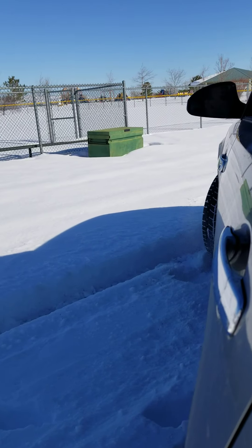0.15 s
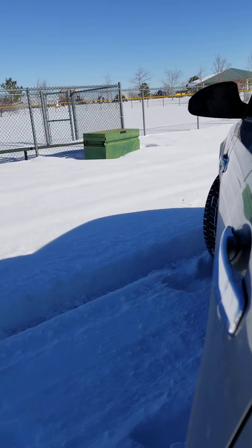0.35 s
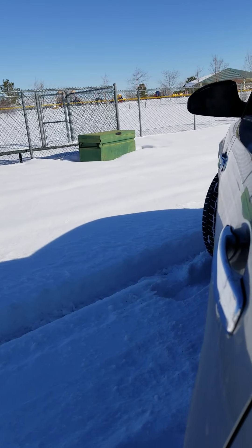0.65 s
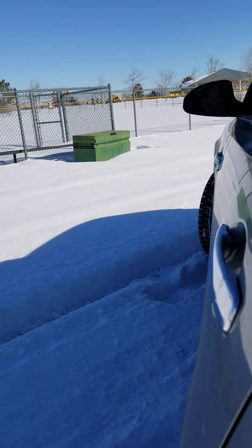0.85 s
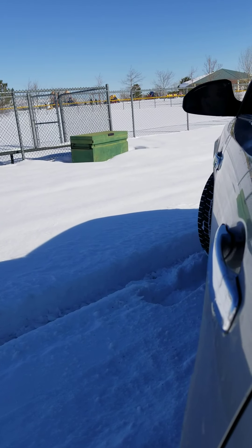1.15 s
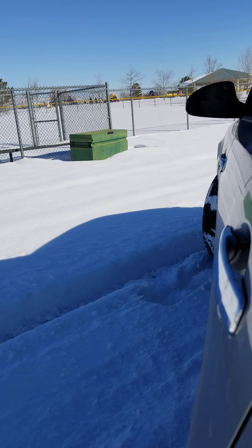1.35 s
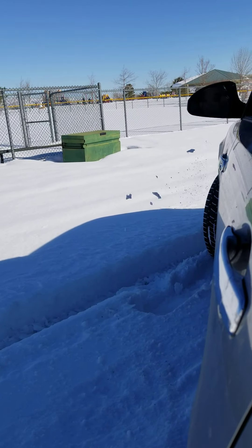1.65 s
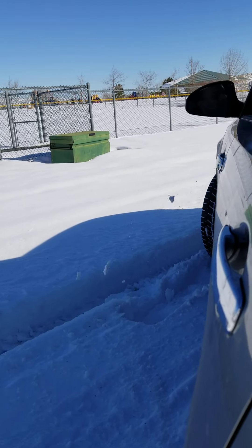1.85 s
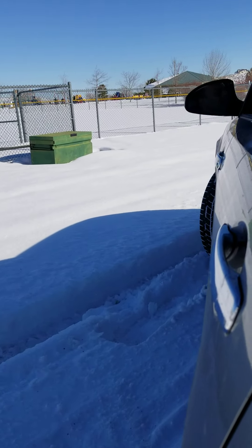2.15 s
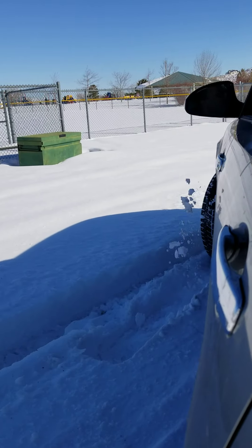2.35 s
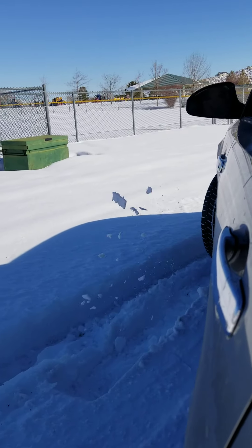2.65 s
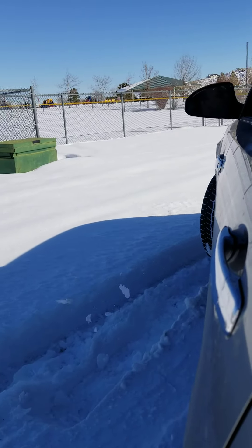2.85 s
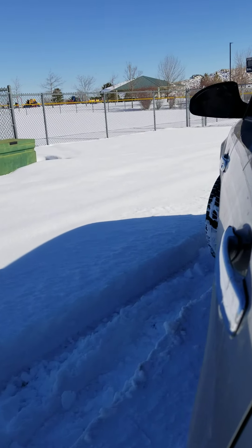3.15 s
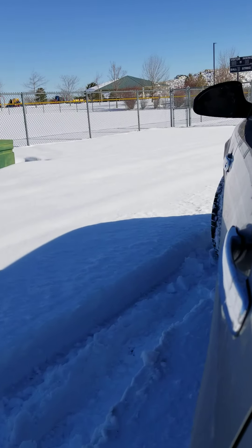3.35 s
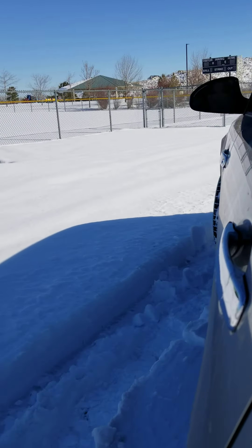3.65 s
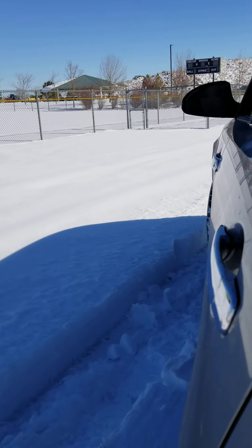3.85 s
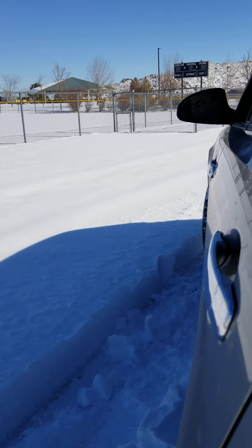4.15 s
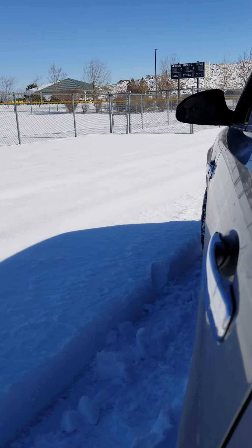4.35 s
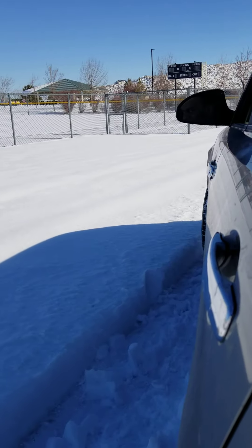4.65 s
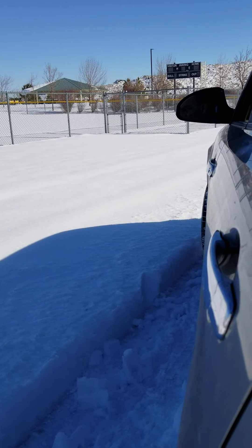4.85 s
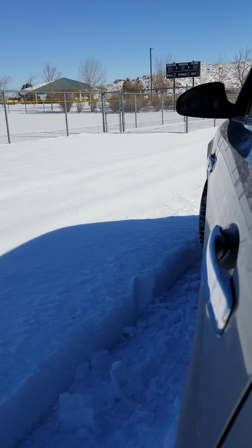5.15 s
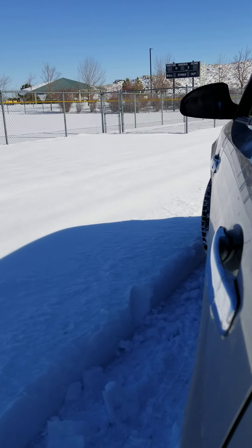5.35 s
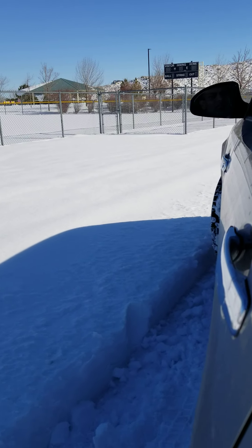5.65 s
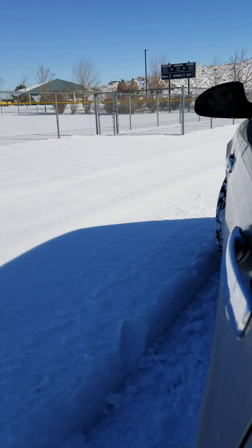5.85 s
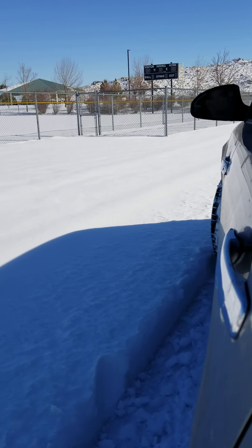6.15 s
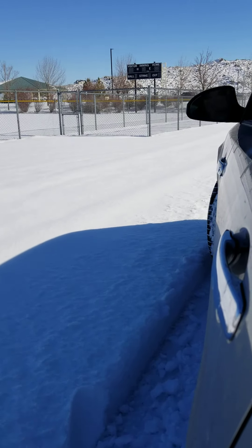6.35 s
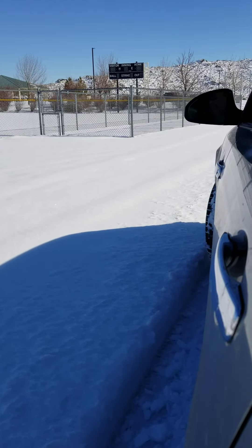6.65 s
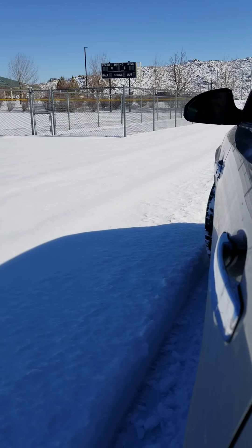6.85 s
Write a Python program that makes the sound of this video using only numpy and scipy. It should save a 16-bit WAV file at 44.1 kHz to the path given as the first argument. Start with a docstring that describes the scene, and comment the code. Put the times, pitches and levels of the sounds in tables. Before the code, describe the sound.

A six-cylinder engine repeatedly revs up and sags in a low boomy growl as a vehicle ploughs through deep snow with soft crunching and faint hissing.

```python
"""Deep snow, heard from the open side window of a V6 SUV that ploughs through it.
The engine revs up and falls back again and again: summed sine waves make its firing pulses, and a pipe
filter makes them boom. A faint howl of the air box joins in when the engine pulls.
Grainy noise makes the tyres' rumble and crunch, the scraping floor and the hissing spray of snow.
Short bursts of noise are lumps, ice crumbs and jolts that hit the body."""
import sys
import numpy as np
from scipy import signal
from scipy.fft import rfft, irfft, next_fast_len
from scipy.io import wavfile

SR = 44100
rng = np.random.default_rng(int(sys.argv[2]) if len(sys.argv) > 2 else 0)


def persist_wave(psi):
    """Save psi, clipped to +-1, as 16-bit WAV."""
    counts = np.round(np.clip(psi, -1, 1) * 32767).astype(np.int16)
    wavfile.write(sys.argv[1], SR, np.atleast_2d(counts).T)


N = 308259
TIME = np.arange(N) / SR

# engine speed before the flywheel smooths it: time_s, firings_per_s
ENGINE_SPEED = [(0.0, 87.3), (0.1, 80.9), (0.22, 66.9), (0.42, 59.7), (0.58, 44.8), (0.69, 57.4),
                (0.86, 51.9), (0.98, 58.8), (1.12, 77.3), (1.24, 87.2), (1.5, 97.4), (1.85, 118.1),
                (2.2, 132.1), (2.35, 124.0), (2.5, 101.7), (2.8, 71.5), (2.93, 68.4), (3.15, 85.4),
                (3.33, 90.6), (3.52, 76.3), (3.8, 54.2), (4.02, 43.0), (4.48, 40.4), (4.68, 52.5),
                (5.03, 81.8), (5.68, 83.9), (6.0, 88.5), (6.3, 64.0), (6.48, 48.9), (6.75, 43.2),
                (6.99, 45.5)]
FLYWHEEL_HZ = 12   # the flywheel rounds off turns of speed that are quicker than this

# presses of the accelerator: start_s, end_s, load (1 = full), bark_share (0 = none, about 1 = full)
PEDAL_PRESSES = [(-.5, -0, 1.05, 0.94), (.82, 2.29, 0.88, 1.07), (2.74, 3.353, 0.98, 0.64),
                 (4.536, 5.962, 0.87, 0.93)]
PRESS_S, LIFT_S = 0.27, 0.23

# shape of the firing pulse, against its base tone: multiple (of the firing rate), level_db
PULSE_OVERTONES = [(2, -4.5), (3, -8.5), (4, -10), (5, -12.5), (6, -14), (7, -17), (8, -18.5), (9, -16.5),
                   (10, -21), (12, -17.5)]
IDLE_DB, LOAD_DB = -26, 8.5   # pulse strength at idle before the pipe, and its gain at full load

# extra gain of the overtones while they bark, greatest where the engine pulls hardest: firings_per_s, gain_db
BARK_GAIN_BY_SPEED = [(56, 1), (66, 2), (76, 10), (93, 10.5), (110, 5), (131, 8)]
BARK_FROM_HZ = 260   # only overtones above about this pitch bark
BARK_IDLE_DB = -9    # their change in level at idle
BARK_LAG_S, BARK_FADE_S = 0.11, 0.32   # they answer the pedal late and fade slowly

# overrun, when the engine coasts with its fuel cut; changes in level:
# start_s, end_s, all_pulses_db (less under load), base_tone_db
COASTING = [(-.3, 0.613, -3, -15), (2.448, 2.723, 1.5, -6.5)]
CUT_S, REFUEL_S = 0.24, 0.19

# the engine nearly stalls once
STALL_AT_S, STALL_WIDTH_S, STALL_DB = 0.603, 0.063, -10

# mismatch of the two cylinder banks, at half the firing rate; it swells to a shudder on the highest rev
BANKS_DB, SHUDDER_DB, SHUDDER_AT_S, SHUDDER_WIDTH_S = -20.5, -3.5, 2.2, 0.05

# tone of the exhaust pipe and silencer: pitch_hz, gain_db
PIPE_TONE = [(22, -53), (33, -10.5), (42, -4), (58, 3.5), (83, -9.5), (103, -14.5), (128, -5), (160, 1.5),
             (186, -2.5), (222, -28.5), (305, -16.5), (364, -11.5), (395, -10), (435, -28.5), (492, -16.5),
             (570, -32.5), (690, -18.5), (900, -26), (1500, -48.5)]

# resonances of the air box, with their level in tune at load 1:
# multiple (of the firing rate that drives it), pitch_hz, width_hz, level_db
AIRBOX_RESONANCES = [(5, 387.5, 44, -35), (9, 688, 93, -42)]

# weight of the snow that the tyres push, as rumble before its gain: time_s, level_db
SNOW_WEIGHT = [(0, -41), (.3, -50.5), (1.0, -53.5), (2.2, -43), (2.9, -49), (3.68, -45.5), (3.85, -42.5),
               (4.7, -45), (6.99, -43)]
# once the car rolls steadily the snow gives way in regular steps
STEPS_FROM_S, STEPS_PER_S, STEP_AT_S, STEP_DB = 3.9, 7.19, 5.78, 1.5

# how hard the tread churns the snow; drives crunch and hiss, before their gains: time_s, level_db
TREAD_CHURN = [(0.0, -56), (0.11, -54), (0.99, -66), (1.36, -56.5), (1.5, -59.5), (2.22, -51.5),
               (3.08, -58), (3.37, -54), (3.77, -62), (3.95, -51), (3.97, -54), (4.81, -62), (4.94, -57.5),
               (6.68, -57.5), (6.97, -64.5), (6.99, -57.5)]
CRUNCH_FOLLOWS = 0.77   # share of the churn's swing that the crunch follows

# clods collapse under the tyre with a loud crunch, before the throb: start_s, length_s, level_db
CRUSHED_CLODS = [(-.02, 0.046, -37), (2.11, .12, -42.5), (3.847, .1, -49.5), (4.046, .07, -45.5),
                 (6.282, 0.1, -43.5)]
CLOD_RISE_S, CLOD_FALL_S = 0.0073, 0.16

# the floor pan drags through a drift: start_s, end_s, level_db
FLOOR_DRAGS = [(1.9, 2.85, -64), (5.466, 5.912, -48), (6.245, 6.696, -48)]
DRAG_RISE_S, DRAG_FALL_S, BRUSH_DB = 0.12, 0.42, -64   # between drifts it only brushes the snow

# fine powder in the air, as spray before its gain: time_s, level_db
AIRBORNE_POWDER = [(0, -74), (.5, -66), (1.0, -77.5), (1.85, -66.5), (2.05, -60.5), (3.5, -63.5),
                   (3.65, -70), (3.9, -60), (5.2, -63.5), (6.7, -66), (6.99, -78)]

# slabs of snow slide off the tyre and burst, before the surges and the spray's gain:
# start_s, length_s, spray_db, hiss_db
SNOW_SLIDES = [(.28, 0.093, -62, -63), (1.946, .14, -73, -55.5), (2.203, 0.21, -70, -51.5),
               (2.676, 0.099, -64, -54), (3.082, 0.086, -64, -58), (3.271, 0.17, -58.5, -53),
               (3.524, 0.037, -60, -54), (3.798, 0.16, -58.5, -57.5), (4.18, 0.14, -58.5, -56),
               (4.414, 0.093, -66, -56.5), (4.928, 0.21, -66, -60), (5.607, 0.11, -60, -53.5),
               (5.77, 0.16, -58.5, -55), (6.03, 0.14, -60, -70), (6.308, .08, -61.5, -61)]
SLIDE_RISE_S, SLIDE_FALL_S = 0.043, 0.044

# tone of each snow noise, before it is set to an even level: pitch_hz, gain_db
RUMBLE_TONE = [(20, -38.5), (30, -20.5), (42, 4.5), (70, 10), (110, 5), (175, 5), (230, 0.5), (330, -6),
               (440, -14.5), (700, -23.5), (1500, -52)]
CRUNCH_TONE = [(150, -25), (330, -1), (480, -1.5), (720, -1), (1000, -7), (1300, -11.5), (1650, -15),
               (2200, -26), (4000, -46.5), (9000, -65)]
SCRAPE_TONE = [(350, -27), (600, -10), (820, 1.5), (1050, -1.5), (1300, -2.5), (1700, -16.5), (3000, -33.5)]
HISS_TONE = [(500, -16), (1200, 1.5), (1750, 8.5), (2300, 2.5), (3100, 1.5), (4000, 1), (5000, -7.5),
             (6000, -5), (7200, -9.5), (9000, -26.5), (14000, -31)]
SPRAY_TONE = [(3000, -33), (4400, -2.5), (5500, 0.5), (6300, -2.5), (8000, -5), (9500, 0.5), (11000, -1),
              (13000, 3), (14500, 0)]
# how alike the two channels are: pitch_hz, likeness (0 to 1)
CHANNEL_LIKENESS = [(60, 1), (200, 1), (400, 0.71), (1000, 0.59), (2500, 0.46), (4000, 0.25), (6500, 0.23),
                    (8500, 0)]

# single blows: start_s, peak_db, decay_s (time to fall by 60 dB)
LUMP_KNOCKS = [(.018, -32, .04), (.136, -29, .025), (.335, -29, .04), (6.285, -31, .1), (6.378, -33, .07),
               (6.418, -34, .04)]   # lumps of snow knocking under the body
ICE_TICKS = [(.358, -40, .008), (.408, -41, .006), (.436, -39, .01), (.477, -40, .008), (.55, -44, .006),
             (.563, -44, .006), (1.413, -38, .02), (2.256, -28, .01), (2.43, -38, .006), (3.587, -37, .014)]      # ice crumbs ticking on the paint
BODY_JOLTS = [(.29, -20, .15), (3.79, -20.5, 0.1), (6.365, -27, 0.054)]     # jolts of the body
# tone of each kind of blow, before its peak is set: pitch_hz, gain_db
KNOCK_TONE = [(100, -10), (400, 0), (750, -1), (1200, -4), (1900, -11), (3000, -24), (8000, -42)]
TICK_TONE = [(600, -30), (2000, 1), (6000, -2), (14000, 5)]
JOLT_TONE = [(20, -32), (48, 2.5), (70, -12.5), (200, -16.5), (350, -52), (1000, -71)]

# tone of the left microphone port against the right: pitch_hz, gain_db
LEFT_PORT_TONE = [(100, 1.2), (320, 2), (750, 0.3), (1400, 0), (2200, 4), (3000, 2), (4000, 0.5), (5300, 3),
                  (6500, 1.5), (7600, -3.5), (8300, -13.5), (9200, -28.5), (10500, -17.5), (12500, -12.5)]
LEFT_LAG_S, CUTOFF_HZ = 0.0004, 14700


def engine_speed():
    """Firings per second: the heavy flywheel resists quick turns of speed, so they are rounded."""
    smoother = signal.butter(1, FLYWHEEL_HZ, fs=SR, output="sos")
    return signal.sosfiltfilt(smoother, in_time(ENGINE_SPEED))


def exhaust(firings, firing_hz, load, uneven_db=-30.5, shake_db=0.72, flutter_db=3.5):
    """Each firing sends a pressure pulse into the pipe; load makes the pulses stronger and sharper."""
    level_db = IDLE_DB + LOAD_DB * load + STALL_DB * swell(STALL_AT_S, STALL_WIDTH_S)
    base_db = 0
    barking = 0
    for start_s, end_s, _, share in PEDAL_PRESSES:
        barking = barking + share * held(start_s + BARK_LAG_S, end_s + BARK_LAG_S, PRESS_S, BARK_FADE_S)
    bark_db = BARK_IDLE_DB + at_hz(BARK_GAIN_BY_SPEED, firing_hz) * barking
    for start_s, end_s, all_pulses_db, base_tone_db in COASTING:
        coasting = held(start_s, end_s, CUT_S, REFUEL_S)
        level_db = level_db + all_pulses_db * coasting * (1 - load)
        base_db = base_db + base_tone_db * coasting

    pulses = from_db(base_db) * np.sin(firings)
    for multiple, overtone_db in PULSE_OVERTONES:
        bark_part = 1 / (1 + (BARK_FROM_HZ / (multiple * firing_hz)) ** 10)   # 0 low down, 1 high up
        flutter = flutter_db * min(multiple / 6, 1) * drift(13)
        strength = from_db(overtone_db + flutter + bark_part * bark_db)
        pulses += strength * np.sin(multiple * firings)
    shudder = from_db(SHUDDER_DB) * swell(SHUDDER_AT_S, SHUDDER_WIDTH_S)
    pulses += (from_db(BANKS_DB) + shudder) * np.sin(firings / 2)
    # the six cylinders differ a little, which fills in tones between the overtones
    for sixth in range(2, 30):
        if sixth % 6:
            strength = from_db(uneven_db) / np.sqrt(max(sixth / 6, 1))
            pulses += strength * np.sin(sixth * firings / 6 + rng.uniform(0, 2 * np.pi))

    pulses *= np.sqrt(2) * from_db(level_db + shake_db * drift(19))
    # a mirrored lead-in, so the pipe is already ringing at the start
    running = np.pad(pulses, (SR // 4, 0), "reflect", reflect_type="odd")
    return colour(running, PIPE_TONE)[-N:]


def intake(firings, firing_hz, load):
    """Under load the air box howls as multiples of the firing rate sweep through its resonances."""
    howl = 0
    for multiple, centre_hz, width_hz, level_db in AIRBOX_RESONANCES:
        off_tune = (multiple * firing_hz - centre_hz) / (width_hz / 2)
        strength = from_db(level_db + 0.8 * drift(16)) / (1 + off_tune ** 2)
        howl = howl + strength * np.sqrt(2) * np.sin(multiple * firings)
    return howl * load ** 2


def tyres(firings, load, churn_db, rumble_db=10.0, crunch_db=-46.5, pulsing=0.19):
    """Snow breaks under the tread in small fractures; under load the crunch throbs with the engine."""
    steps = (TIME > STEPS_FROM_S) * np.cos(2 * np.pi * STEPS_PER_S * (TIME - STEP_AT_S))
    weight_db = in_time(SNOW_WEIGHT) + STEP_DB * steps
    swing_db = CRUNCH_FOLLOWS * (churn_db - churn_db.mean())
    clods = 0
    for start_s, length_s, level_db in CRUSHED_CLODS:
        clods = clods + from_db(level_db) * held(start_s, start_s + length_s, CLOD_RISE_S, CLOD_FALL_S)

    rumble = spread_noise(RUMBLE_TONE, grains(per_s=120, length_s=0.0059, size_db=4.5, bed=2.5))
    crunch = spread_noise(CRUNCH_TONE, grains(per_s=240, length_s=0.015, size_db=1.4, bed=2.5))
    throb = 1 + pulsing * load * np.cos(firings)
    crunch_level = np.hypot(from_db(swing_db + crunch_db), clods)
    return from_db(weight_db + rumble_db) * rumble + crunch_level * crunch * throb


def floor_scrape():
    """The floor pan rubs over the snow, breaking it in small fractures, and drags harder in the drifts."""
    drag = from_db(BRUSH_DB)
    for start_s, end_s, level_db in FLOOR_DRAGS:
        drag = drag + from_db(level_db) * held(start_s, end_s, DRAG_RISE_S, DRAG_FALL_S)
    return drag * spread_noise(SCRAPE_TONE, grains(per_s=150, length_s=0.0087, size_db=3.0, bed=0.37))


def thrown_snow(churn_db, hiss_db=0.82, spray_db=9.5, surge_db=0.84):
    """Powder slides off the tyre in uneven surges and its crystals patter in the wheel arch."""
    surge = from_db(surge_db * drift(12))
    coarse = from_db(churn_db + hiss_db)
    fine = from_db(in_time(AIRBORNE_POWDER))
    for start_s, length_s, slide_spray_db, slide_hiss_db in SNOW_SLIDES:
        slide = held(start_s, start_s + length_s, SLIDE_RISE_S, SLIDE_FALL_S)
        coarse = np.hypot(coarse, from_db(slide_hiss_db) * slide)
        fine = np.hypot(fine, from_db(slide_spray_db) * slide)
    hiss = spread_noise(HISS_TONE, grains(per_s=640, length_s=0.0056, size_db=3.5, bed=2.3))
    spray = spread_noise(SPRAY_TONE, grains(per_s=1200, length_s=0.00064, size_db=0.5, bed=0.98))
    return surge * (coarse * hiss + from_db(spray_db) * fine * spray)


def blows(table, tone):
    """Each blow is a crumbling burst of noise that dies away, coloured by what it strikes."""
    out = np.zeros(N)
    age = TIME[:SR // 3]
    for start_s, peak_db, decay_s in table:
        noise = rng.standard_normal(len(age))
        burst = colour(noise * from_db(-60 * age / decay_s), tone)
        burst *= from_db(peak_db) / np.abs(burst).max()
        start = max(round(start_s * SR), 0)
        out[start:start + len(age)] += burst[:N - start]
    return out


def grains(per_s, length_s, size_db, bed):
    """Loudness of many small fractures of uneven size, each dying fast, over a smooth bed."""
    sizes = from_db(size_db * np.minimum(rng.exponential(1, N), 4))
    born = rng.random(N) < per_s / SR
    fade = np.exp(-2 / (length_s * SR))
    power = signal.lfilter([1], [1, -fade], (born * sizes) ** 2 + 1e-18)
    return np.sqrt(bed + power / power.mean())


def spread_noise(tone, envelope):
    """Grainy stereo noise, most alike in both channels in the bass; average (rms) level 1."""
    size = next_fast_len(N, real=True)
    white = rfft(rng.standard_normal((3, N)) * envelope, size)
    alike = at_hz(CHANNEL_LIKENESS, np.fft.rfftfreq(size, 1 / SR))
    # one noise is shared, the other two belong to one channel each
    mixed = np.sqrt(alike) * white[0] + np.sqrt(1 - alike) * white[1:]
    return rms_one(colour(irfft(mixed, size)[:, :N], tone))


def colour(x, tone):
    """Filter with the given gains that never sounds ahead of its input (minimum phase)."""
    size = next_fast_len(x.shape[-1] + SR // 4, real=True)
    log_gain = np.log(from_db(at_hz(tone, np.fft.fftfreq(size, 1 / SR))))
    response = np.exp(np.conj(signal.hilbert(log_gain)))[:size // 2 + 1]
    return irfft(rfft(x, size) * response, size)[..., :x.shape[-1]]


def drift(rate):
    """Smooth random wandering that changes about `rate` times a second; typical size 1."""
    hz = np.fft.rfftfreq(N, 1 / SR)[:N // 64]
    noise = rfft(rng.standard_normal(2 * len(hz)))[:len(hz)]
    slow = rms_one(irfft(noise / (1 + (hz / rate) ** 2)))
    return np.interp(TIME, np.linspace(0, TIME[-1], len(slow)), slow)


def held(start_s, end_s, attack_s, release_s):
    """A curve from 0 to 1: it rises from the start, holds, and falls from the end."""
    rise = (TIME - start_s) / attack_s
    fall = 1 - (TIME - end_s) / release_s
    return np.clip(np.minimum(rise, fall), 0, 1)


def swell(at_s, width_s):
    """A bell-shaped curve of height 1."""
    return np.exp(-((TIME - at_s) / width_s) ** 2)


def in_time(rows):
    """A curve of (time, value) points read at every sample."""
    known_s, values = np.transpose(rows)
    return np.interp(TIME, known_s, values)


def at_hz(points, hz):
    """A curve over pitch (or firing rate), read on a logarithmic axis."""
    known_hz, values = np.transpose(points)
    return np.interp(np.log(np.abs(hz) + 1), np.log(known_hz), values)


def from_db(db):
    """Decibels as a plain factor."""
    return 10 ** (np.asarray(db) / 20)


def rms_one(x):
    """The signal scaled to an average (rms) level of 1."""
    return x / np.sqrt(np.mean(x ** 2) + 1e-20)


def scene():
    """Engine, tyres, scraping floor, thrown snow and single blows, added together."""
    firing_hz = engine_speed()
    firings = 2 * np.pi * np.cumsum(firing_hz) / SR   # one full turn of phase per firing
    load = sum(depth * held(start_s, end_s, PRESS_S, LIFT_S) for start_s, end_s, depth, _ in PEDAL_PRESSES)
    churn_db = in_time(TREAD_CHURN)
    engine = exhaust(firings, firing_hz, load) + intake(firings, firing_hz, load)
    snow = tyres(firings, load, churn_db) + floor_scrape() + thrown_snow(churn_db)
    hits = blows(LUMP_KNOCKS, KNOCK_TONE) + blows(ICE_TICKS, TICK_TONE) + blows(BODY_JOLTS, JOLT_TONE)
    return engine + snow + hits


def record(dry):
    """The left port hears later and with a colour of its own; the top is cut steeply on both."""
    size = next_fast_len(N + SR // 10, real=True)
    hz = np.fft.rfftfreq(size, 1 / SR)
    left, right = rfft(dry, size)
    delay = np.exp(-2j * np.pi * hz * LEFT_LAG_S)
    left = left * from_db(at_hz(LEFT_PORT_TONE, hz)) * delay
    low_pass = 1 / np.sqrt(1 + (hz / CUTOFF_HZ) ** 400)
    return irfft(np.array([left, right]) * low_pass, size)[:, :N]


dry = scene()
out = record(dry)
persist_wave(out)
```